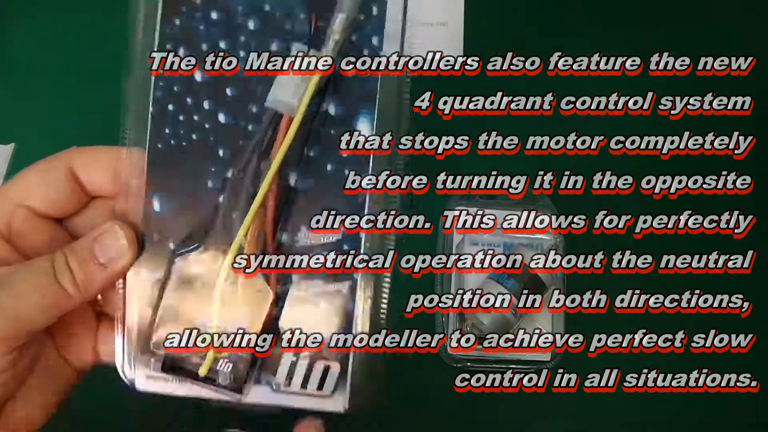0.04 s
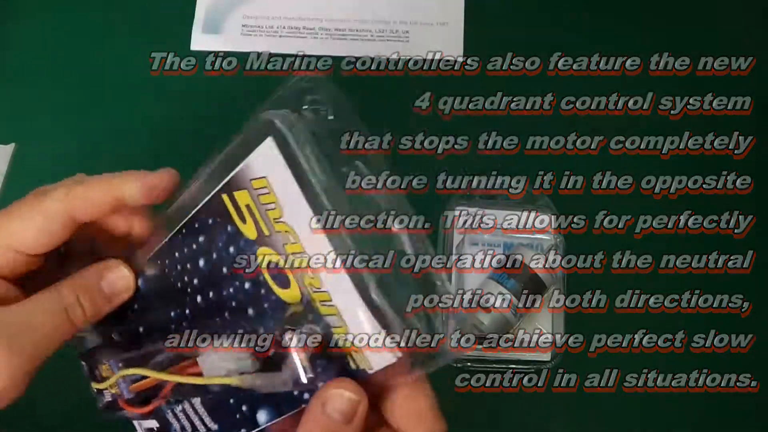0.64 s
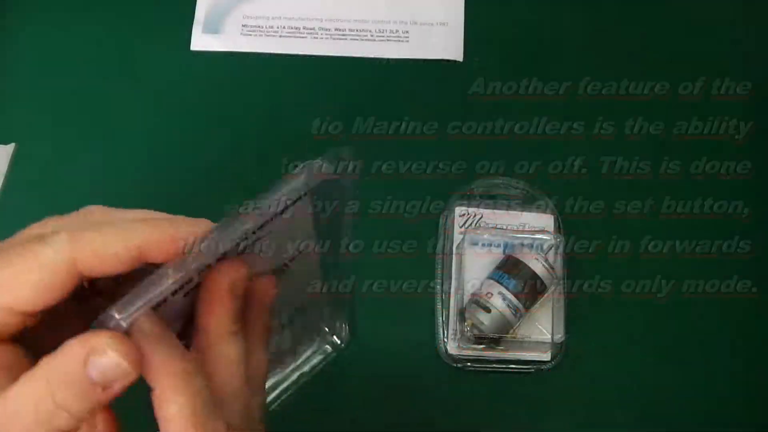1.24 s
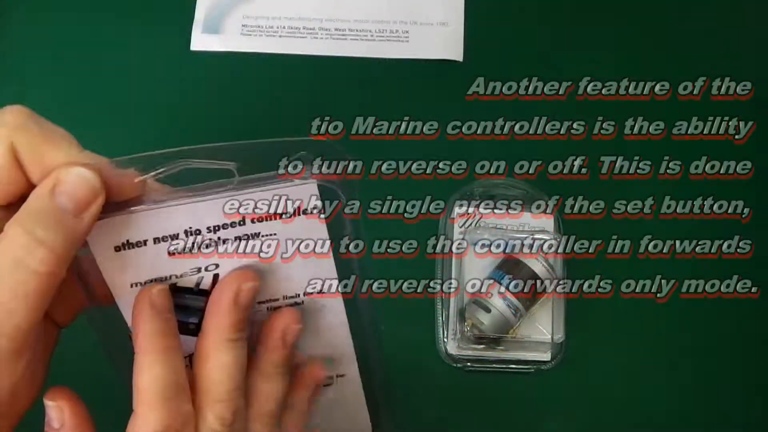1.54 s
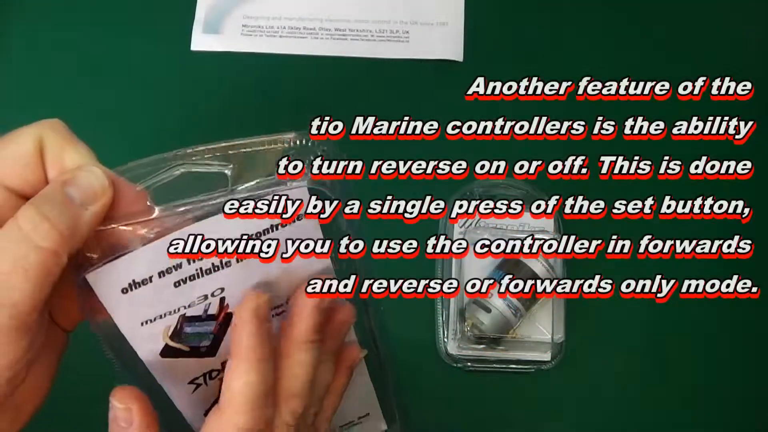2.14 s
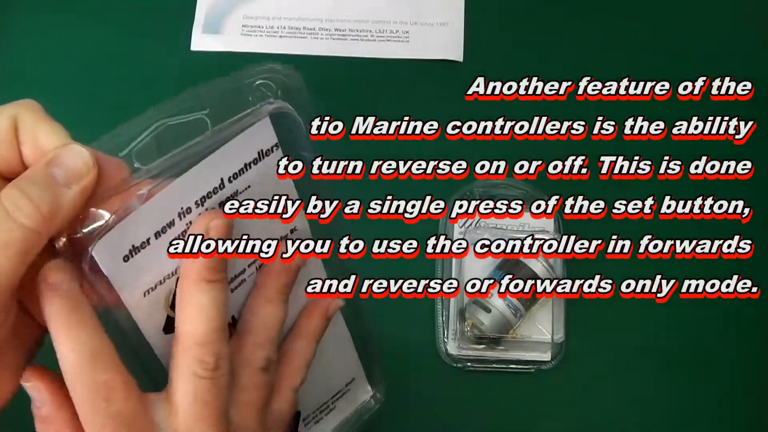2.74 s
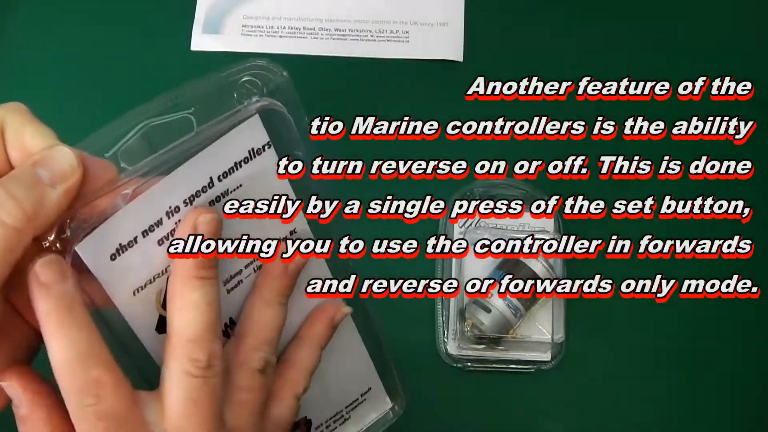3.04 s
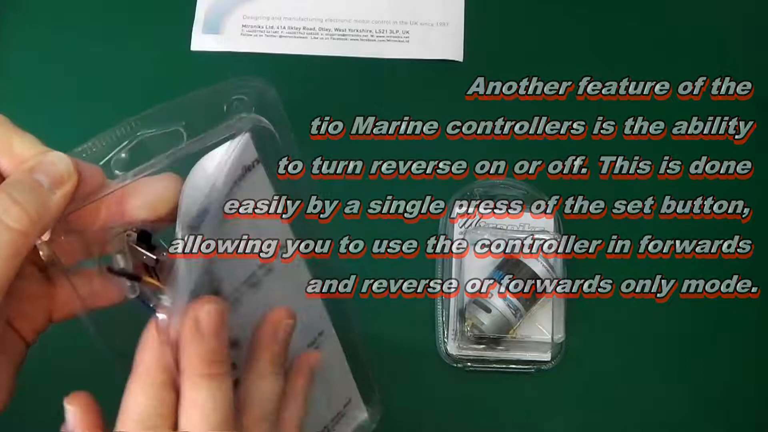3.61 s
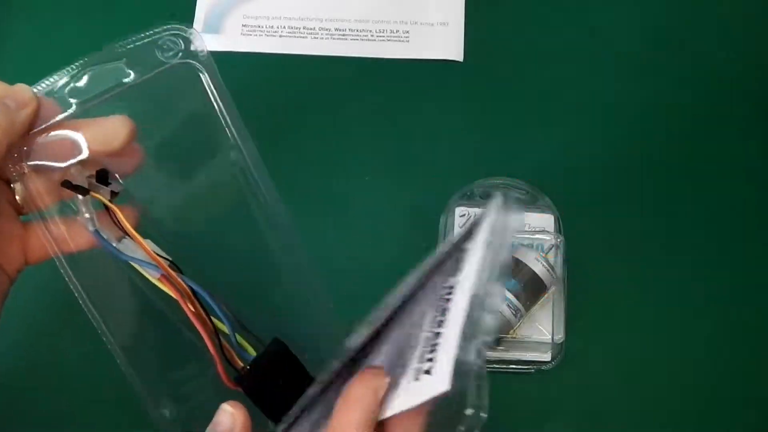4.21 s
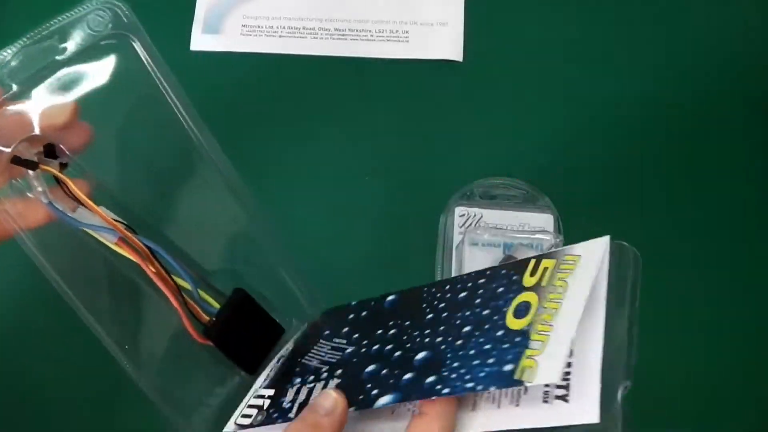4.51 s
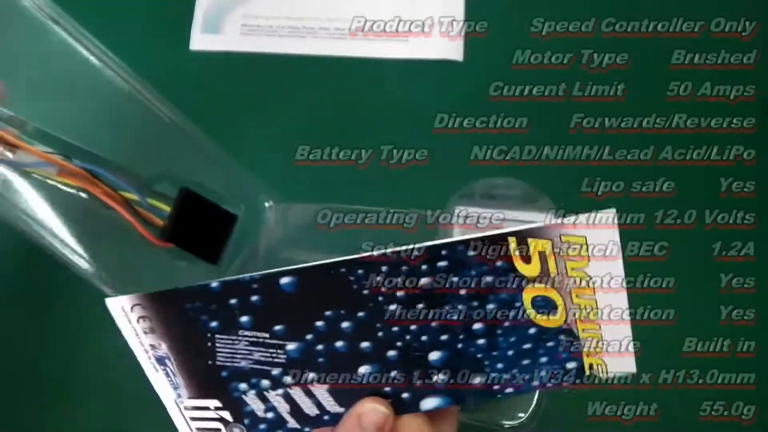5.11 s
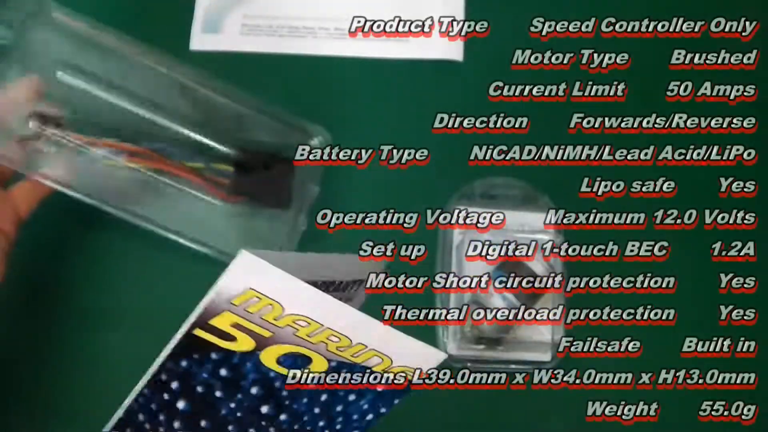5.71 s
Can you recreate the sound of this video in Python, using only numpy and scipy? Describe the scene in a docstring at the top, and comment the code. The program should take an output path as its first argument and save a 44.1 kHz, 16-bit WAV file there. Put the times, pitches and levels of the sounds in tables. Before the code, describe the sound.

Close to the microphone in a small, softly humming room, thin plastic packaging rasps and ticks under the fingers. Quick runs of sharp snaps and hollow pops follow as its edges are pulled apart, until the shell gives way with loud cracks and a thump. The sound then softens to the hissy sliding of card and paper being drawn out, and ends with another brief burst of plastic snaps.

```python
"""First, hands turn a stiff plastic blister pack over a desk in a small, softly humming room: sliding
edges rasp in tiny slips, and each snap rings a patch of the thin shell. From about 1.5 s the hands
grip the pack and prise its rim apart; it snaps, its domes pop, and it thumps when it jumps. Near 3.7 s
it bursts open. Then the card and paper leaflet slide out, and a few last snaps come near 5.7 s as the
pack is put aside."""
import sys
import numpy as np
from scipy import signal
from scipy.fft import rfft, irfft, next_fast_len
from scipy.io import wavfile

SR = 44100
rng = np.random.default_rng(int(sys.argv[2]) if len(sys.argv) > 2 else 0)


def pcm_store(signal):
    """Save signal as 16-bit PCM."""
    levels = np.round(np.clip(np.atleast_2d(signal), -1, 1) * 32767)
    wavfile.write(sys.argv[1], SR, levels.astype(np.int16).T)


N = 258426
TIME = np.arange(N) / SR


def amp(db):
    """Turn decibels into a number to multiply by."""
    return 10 ** (np.asarray(db) / 20)


def unit(x):
    """Scale a sound so that its average strength (rms) is 1."""
    return x / np.sqrt(np.mean(np.abs(x) ** 2))


def fade(t, t60):
    """A smooth dying away that loses 60 dB every t60 seconds."""
    return np.exp(-np.log(1000) * t / max(t60, 1e-3))


def add(track, start_s, sound):
    """Mix a sound into a track."""
    i = max(int(start_s * SR), 0)
    part = sound[:max(N - i, 0)]
    track[i:i + len(part)] += part


def filtered(x, response):
    """Turn each frequency of x up or down by response(hz)."""
    count = x.shape[-1]
    size = 2 * next_fast_len(count // 2 + 4096)
    hz = np.maximum(np.arange(size // 2 + 1) * SR / size, 1)
    return irfft(rfft(x, size) * response(hz), size)[..., :count]


def causal(db):
    """A filter with these levels that makes no sound before the blow (minimum phase)."""
    cepstrum = irfft(db * np.log(10) / 20)
    half = len(cepstrum) // 2
    cepstrum[1:half] *= 2
    cepstrum[half + 1:] = 0
    return np.exp(rfft(cepstrum))


def level_at(points, hz):
    """Read the level between (f/Hz, level/dB) points, with octaves evenly spaced."""
    point_hz, point_db = np.array(points).T
    return np.interp(np.log(hz), np.log(point_hz), point_db)


def diffuse_noise(size, apart_hz, bass_side):
    """Noise from all around: two close microphones agree on low notes and differ on high ones."""
    mid, side = rng.standard_normal((2, size))
    side_share = lambda hz: np.clip(bass_side + .5 * hz ** 2 / (hz ** 2 + apart_hz ** 2), 0, .5)
    mid = filtered(mid, lambda hz: np.sqrt(1 - side_share(hz)))
    side = filtered(side, lambda hz: np.sqrt(side_share(hz)))
    return np.array([mid + side, mid - side])


# The tone of the steady room noise: f/Hz, relative level/dB
ROOM_TONE = [(15, -39), (25, -16), (91, 3.5), (178, -10), (233, -16.5), (305, -4.5), (421, -1), (598, -7.5),
             (762, -4.5), (1570, -12.5), (3000, -14.5), (4040, -18), (8810, -21), (11500, -26.5),
             (15500, -31)]
def room_noise(level_db=-48):
    """The low rumble and soft hiss of the room."""
    noise = diffuse_noise(N, apart_hz=4700, bass_side=0.14)
    return amp(level_db) * unit(filtered(noise, lambda hz: amp(level_at(ROOM_TONE, hz))))


def turning(x, new_echoes, hop_s=.3):
    """The pack keeps turning, so each stretch of its sound meets a new pattern of echoes."""
    hop = int(hop_s * SR)
    out = np.zeros((2, N))
    for start in range(-hop, N, hop):
        i = np.arange(max(start, 0), min(start + 2 * hop, N))
        piece = x[i] * np.sin(np.pi * (i - start) / (2 * hop))
        for channel, echoes in zip(out, new_echoes()):
            add(channel, i[0] / SR, signal.fftconvolve(piece, echoes))
    return out


def room_echo(x, level_db=-5, t60=0.16, rise_t60=0.013):
    """Sound bounces off the desk and walls and blurs into a short tail."""
    t = TIME[:SR // 4]
    def new_echoes():
        noise = diffuse_noise(len(t), apart_hz=4150, bass_side=0.0039)
        tail = noise * fade(t, t60) * (1 - fade(t, rise_t60))
        return amp(level_db) * unit(tail) / np.sqrt(len(t))
    return turning(x, new_echoes)


def direct_sound(x, right_delay_s=.000012, spread_db=-3, spread_hz=7500, spread_t60=0.014):
    """Sound reaches the left side first; the pack's broad faces send different highs to each side."""
    t = TIME[:SR // 50]
    def new_echoes():
        scatter = unit(rng.standard_normal(len(t)) * fade(t, spread_t60)) / np.sqrt(len(t))
        return scatter, -scatter
    scattered_highs = filtered(turning(x, new_echoes), lambda hz: 1j * hz / (spread_hz + 1j * hz))
    right = filtered(x, lambda hz: np.exp(-2j * np.pi * hz * right_delay_s))
    return np.array([x, right]) + amp(spread_db) * scattered_highs


# How much louder the pack is on the left than on the right: f/Hz, level/dB
LEFT_OVER_RIGHT = [(300, -2), (2000, -1.7), (5500, 0.5), (9000, 1.5), (14000, -1.8)]
def balance(left, right):
    """Some pitches lean a little to the left, others to the right."""
    left = filtered(left, lambda hz: amp(level_at(LEFT_OVER_RIGHT, hz) / 2))
    right = filtered(right, lambda hz: amp(-level_at(LEFT_OVER_RIGHT, hz) / 2))
    return np.array([left, right])


# How well the thin sheet passes each pitch to the air: f/Hz, level/dB
SHEET_TO_AIR = [(60, -30), (280, -4), (390, -0.5), (650, -2.5), (1200, 0.5), (9000, -1.5), (13000, -4.5),
                (15500, -12.5)]
# The notes at which the hollow pack rings: f/Hz, width/Hz, level/dB
BODY_NOTES = [(378.6, 28, 0), (515, 19, 4.5), (610, 62, 3.5), (755, 25, -0.5), (850, 88, -4),
              (950, 8.8, -11), (1080, 35, -22), (1296, 18, -5), (1478, 22, 2.5), (1880, 44, -30),
              (1735, 32, -10), (2166, 300, -16), (2560, 97, -33)]
def hollow_body(x):
    """Shaking the pack also rings its hollow body."""
    def response(hz):
        notes = sum(amp(db) / (1 + 1j * (hz / f - f / hz) * f / width) for f, width, db in BODY_NOTES)
        return (1 + notes) * causal(level_at(SHEET_TO_AIR, hz))
    return filtered(x, response)


def sheet_patch(x, ring_hz, bass_cut, dullness, ring_db=-6, sharpness=6):
    """A patch of sheet favours one pitch and is weaker below (bass_cut) and above (dullness)."""
    def response(hz):
        octaves = np.log2(hz / ring_hz)
        # Both slopes are in dB per octave; their sign is ignored.
        low_loss_db = abs(bass_cut) * np.logaddexp(0, -5 * octaves) / 5
        high_loss_db = abs(dullness) * np.logaddexp(0, 5 * octaves) / 5
        ring = amp(ring_db) / (1 + 1j * sharpness * (hz / ring_hz - ring_hz / hz))
        return (1 + ring) * causal(-np.minimum(low_loss_db + high_loss_db, 50))
    return unit(filtered(x, response)) * np.std(x)  # as strong as it came in


# Slides of plastic, card and fingers:
# fastest moment t/s, length/s, level/dB, strongest f/Hz, dullness/(dB per octave)
STROKES = [ (0.026, 0.036, -40, 2820, 10.5), (0.061, 0.032, -43, 3400, 8), (0.228, 0.18, -51, 2000, 1.5),
           (0.303, .06, -41.5, 1790, 2), (0.442, .08, -39.5, 2050, 5.5), (0.512, .1, -46, 1650, 6),
           (0.591, 0.095, -42, 1830, 4), (0.666, 0.083, -41, 1630, 5), (1.098, 0.1, -40.5, 1760, 4),
           (1.265, .07, -53.5, 2480, 5), (1.426, 0.18, -47.5, 3560, 3), (1.721, 0.36, -44, 2180, 4.5),
           (1.881, 0.042, -27, 820, 2.5), (2.028, .045, -41, 2600, 5.5), (2.571, 0.28, -43.5, 3010, 4.5),
           (2.8, 0.34, -52, 3700, 28), (2.89, 0.049, -26.5, 3080, 7), (3.11, 0.15, -48, 1790, 5.5),
           (3.487, .31, -41.5, 4400, 7.5), (3.544, 0.11, -37, 2070, 4), (3.677, .055, -20, 950, 4),
           (3.774, .22, -42, 2300, 3.5), (4.027, .05, -41, 3145, 12), (4.189, .06, -43, 3000, 2.5),
           (4.246, .18, -44.5, 5400, 4), (4.388, 0.087, -51, 5980, -3), (4.5, 0.42, -55.5, 3050, 22),
           (4.701, .5, -50, 6460, -1.5), (4.766, .1, -41.5, 5270, 1), (4.863, .065, -41.5, 4470, 6),
           (4.93, 0.068, -41.5, 2080, 6.5), (5.068, .055, -40.5, 2400, -1), (5.44, .1, -46.5, 1700, 6),
           (5.558, .07, -35, 1500, 6)]
def slides(slips_per_s=1200, scatter_db=5, slip_t60=0.031, hiss_db=-3, swell=0.68, slow_pull_s=.55):
    """Sliding surfaces catch and let go in uneven little slips over a smooth hiss."""
    out, t = np.zeros(N), TIME[:SR // 40]
    for fastest_s, length_s, db, ring_hz, dullness in STROKES:
        size = int(length_s * SR)
        slipping = rng.random(size) < slips_per_s / SR
        slips = slipping * amp(scatter_db * np.minimum(rng.exponential(size=size), 4))
        energy = np.abs(signal.fftconvolve(slips ** 2, fade(t, slip_t60) ** 2)[:size]) + 1e-9
        roughness = unit(np.sqrt(energy / energy.mean() + amp(hiss_db) ** 2))
        # A longer slide spends more of its time speeding up.
        speed_up_s = length_s * np.clip(length_s / slow_pull_s, .22, .55)
        speed = np.interp(TIME[:size], [0, speed_up_s, length_s], [0, 1, 0])
        rasp = speed ** swell * roughness * rng.standard_normal(size)
        rasp = sheet_patch(rasp, ring_hz, bass_cut=2.66, dullness=dullness)
        add(out, fastest_s - speed_up_s, amp(db) * rasp)
    return out


def crackle(count=64, range_db=7, middle_hz=3100, range_octaves=1.5):
    """Faint ticks of random size and pitch come loose during slides, louder on firmer strokes."""
    out = np.zeros(N)
    fastest_s, length_s, stroke_db = np.array(STROKES).T[:3]
    share = np.cumsum(length_s) / length_s.sum()
    for k, (when, size, pitch) in enumerate(rng.random((count, 3)) - .5):
        i = np.searchsorted(share, (k + .5) / count)  # longer strokes get more ticks
        db = min(stroke_db[i] + 1, -39) + range_db * size
        tick = snap(middle_hz * 2 ** (range_octaves * pitch), dullness=6, t60=0.031)
        add(out, fastest_s[i] + when * length_s[i] / 2, amp(db) * tick)
    return out


# Jumps of the whole pack: t/s, swing level/dB, swing f/Hz, knock level/dB
JUMPS = [(1.885, -40, 150, -30.5), (2.052, -31.5, 140, -28), (2.57, -26, 140, -34.5),
         (3.675, -22, 113, -36), (3.684, -23.5, 193, -14), (5.552, -31.5, 118, -36)]
def thumps(rise_t60=0.0078, swing_t60=0.082, knock_t60=0.09, soft_hz=490):
    """The pack swings until the hands calm it; the soft jolt knocks its two lowest notes."""
    out, t = np.zeros(N), TIME[:SR // 3]
    low_notes = sum(amp(db) / (1 + (hz / soft_hz) ** 4) * np.sin(2 * np.pi * hz * t)
                    for hz, _, db in BODY_NOTES[:2])
    for start_s, swing_db, hz, knock_db in JUMPS:
        swing = amp(swing_db) * np.sin(2 * np.pi * hz * t) * fade(t, swing_t60)
        knock = amp(knock_db) * low_notes * fade(t, knock_t60)
        add(out, start_s, (swing + knock) * (1 - fade(t, rise_t60)))
    return out


# The notes of one plastic dome: multiple of the lowest note, level/dB
DOME_NOTES = [(1, 4), (1.115, -1.5), (1.18, -2.5), (1.51, -6)]
# Domes flipping inside out: t/s, level/dB, lowest note f/Hz
DOME_FLIPS = [(0.6755, -43.5, 1530), (1.1017, -25.5, 1417), (1.659, -35, 2060), (1.741, -32, 1980),
              (1.7621, -34, 2026), (3.2988, -12.5, 1570)]
def pops(rise_t60=0.0019, t60=0.035, crack_db=3, low_cut_hz=1000):
    """A flipping dome cracks and rings a few close, hollow notes; it is too small to give off bass."""
    out, t = np.zeros(N), TIME[:SR // 5]
    for start_s, db, hz in DOME_FLIPS:
        notes = sum(amp(note_db) * np.sin(2 * np.pi * (hz * ratio * t + rng.random()))
                    for ratio, note_db in DOME_NOTES)
        add(out, start_s, amp(db) * notes * fade(t, t60) * (1 - fade(t, rise_t60)))
        crack = snap(1.2 * hz, dullness=11, t60=0.02, bass_cut=26)
        add(out, start_s, amp(db + crack_db) * crack)
    return signal.sosfilt(signal.butter(2, low_cut_hz, "high", fs=SR, output="sos"), out)


def snap(ring_hz, dullness, t60, bass_cut=4.57, crack_db=-2, crack_t60=0.0074, ring_db=-1):
    """One sharp crack spreads into the sheet's many crowded notes, which quickly die away."""
    t = TIME[:SR // 6]
    ring = amp(ring_db) * fade(t, t60)
    crack = amp(crack_db) * fade(t, crack_t60)
    rise = 1 - fade(t, t60=0.001)
    noise = rng.choice([-1, 1], len(t))
    return sheet_patch((ring + crack) * rise * noise, ring_hz, bass_cut, dullness)


# The shell buckles or catches: t/s, level/dB, strongest f/Hz, dullness/(dB per octave)
BUCKLES = [ (0.128, -38.5, 3950, 5), (0.285, -33.5, 1650, 3.5), (0.9129, -44.5, 1780, 4.5),
           (1.067, -32.5, 2680, 3), (1.1011, -27.5, 1860, 4), (1.148, -37.5, 4500, 3),
           (1.3392, -31, 1674, 1), (1.3576, -29.5, 3200, 3), (1.375, -39, 1990, 3),
           (1.5358, -32, 1880, 0.5), (1.5763, -24.5, 2530, 3.5), (1.6182, -24.5, 2280, 2),
           (1.6588, -24, 2390, 3), (1.6871, -23.5, 2100, 2), (1.7412, -23, 2460, 2.5),
           (1.762, -25.5, 2300, 4), (1.844, -33, 2550, 6.5), (1.884, -14.5, 870, 0),
           (2.0485, -23.5, 880, 8.5), (2.053, -16.5, 2350, 8), (2.0827, -28.5, 1110, 11),
           (2.2443, -25.5, 6400, 20), (2.3208, -41, 4530, 8), (2.4624, -25, 5350, 11),
           (2.4879, -36.5, 930, 4.5), (2.5687, -18.5, 1500, 4), (2.6142, -33, 3700, 11),
           (2.626, -36, 3900, 12), (2.6398, -32, 3670, 14), (2.8925, -20, 3440, 14),
           (2.9115, -26.5, 2940, 7), (3.093, -34.5, 3280, 12), (3.195, -22.5, 1630, 21),
           (3.227, -35, 2400, 11), (3.4914, -26.5, 2600, 7), (3.5114, -25.5, 2420, 16),
           (3.6752, -14.5, 1230, 2.5), (3.6828, -13, 1120, 3.5), (3.6886, -14, 1190, 7.5),
           (3.6958, -17.5, 915, 2), (3.7253, -25.5, 2100, 9), (3.744, -25.5, 2500, 14),
           (3.7755, -25, 1340, 6.5), (3.8426, -12, 4630, 8), (4.071, -38, 2650, 5),
           (4.7433, -33.5, 1260, 6), (5.0609, -26, 2300, 15), (5.3831, -33, 2440, 9),
           (5.594, -22.5, 5600, 10), (5.7038, -32.5, 1500, 3), (5.741, -29, 1510, 2),
           (5.762, -11.5, 5900, 8), (5.765, -15.5, 1980, 4), (5.7734, -19.5, 1400, 2)]
def snaps(grip_start_s=1.45, grip_end_s=4.2, gripped_t60=.038, loose_t60=.07):
    """The pack snaps as it is turned, prised open and put aside; a tight grip shortens the ring."""
    out = np.zeros(N)
    for start_s, db, ring_hz, dullness in BUCKLES:
        t60_at_2000_hz = gripped_t60 if grip_start_s < start_s < grip_end_s else loose_t60
        t60 = t60_at_2000_hz * (2000 / ring_hz) ** .55  # small, high patches die away sooner
        add(out, start_s, amp(db) * snap(ring_hz, dullness, t60))
    return out


def scene():
    """The pack heard from close by, with its echo and the room noise."""
    pack = hollow_body(snaps() + crackle() + slides()) + pops() + thumps()
    left, right = direct_sound(pack) + room_echo(pack)
    return balance(left, right) + room_noise()


def record(dry, top_hz=15500):
    """The microphones round off the loudest peaks and lose the very highest pitches."""
    high_cut = signal.ellip(8, .2, 80, top_hz, fs=SR, output="sos")
    return signal.sosfilt(high_cut, np.tanh(dry))


dry = scene()
out = record(dry)
pcm_store(out)
```